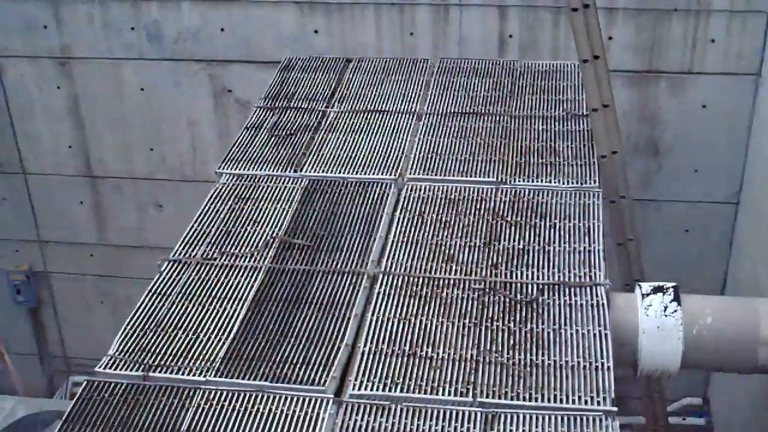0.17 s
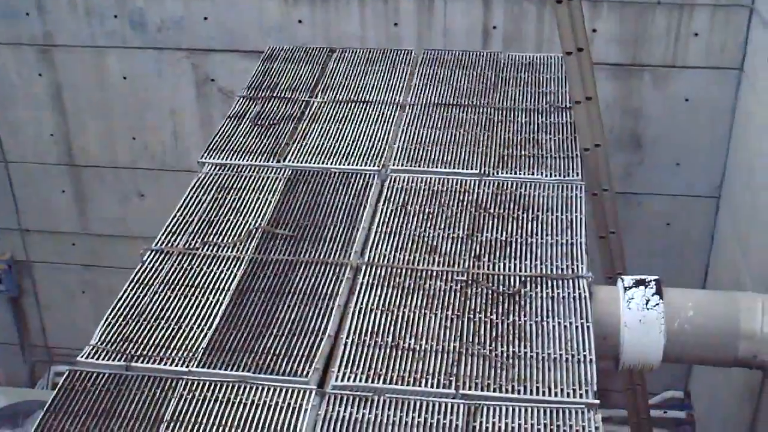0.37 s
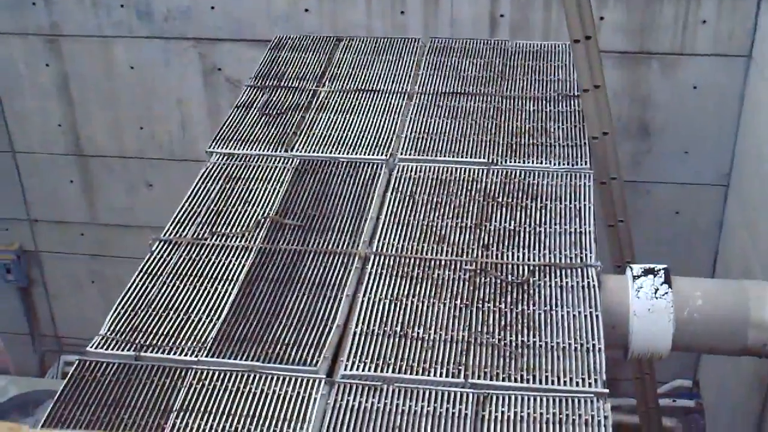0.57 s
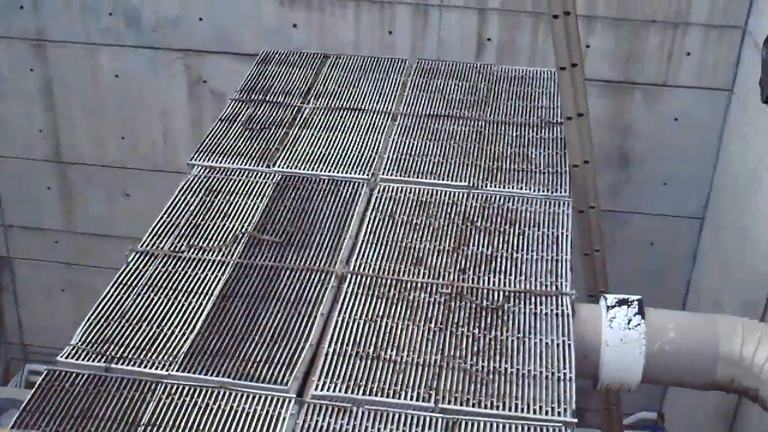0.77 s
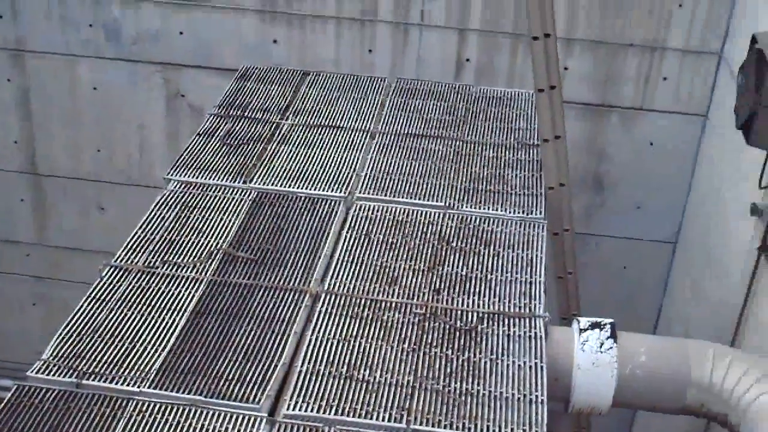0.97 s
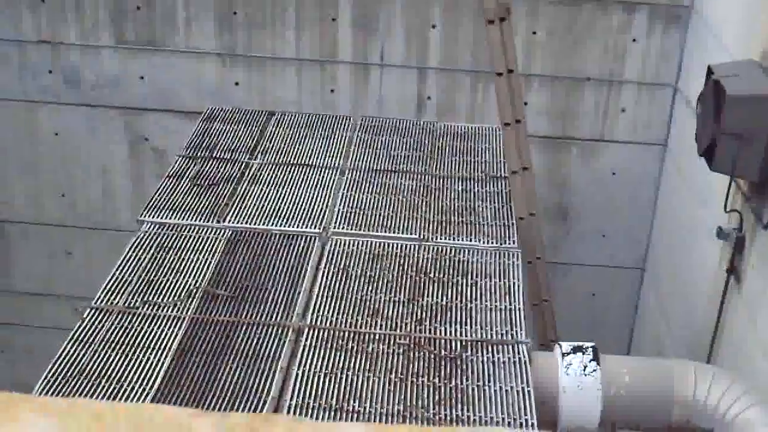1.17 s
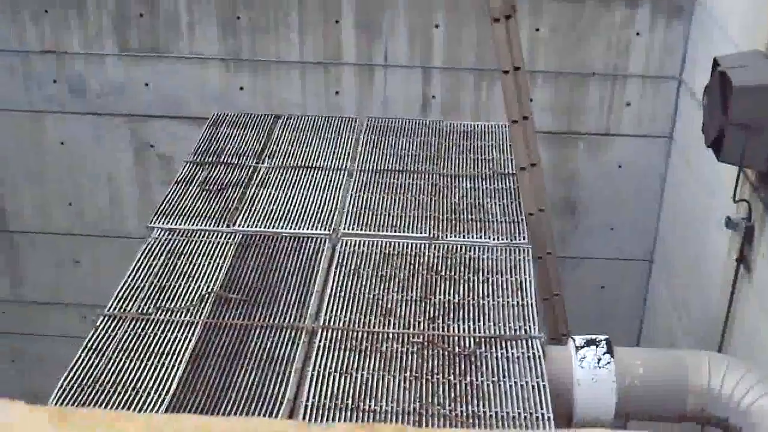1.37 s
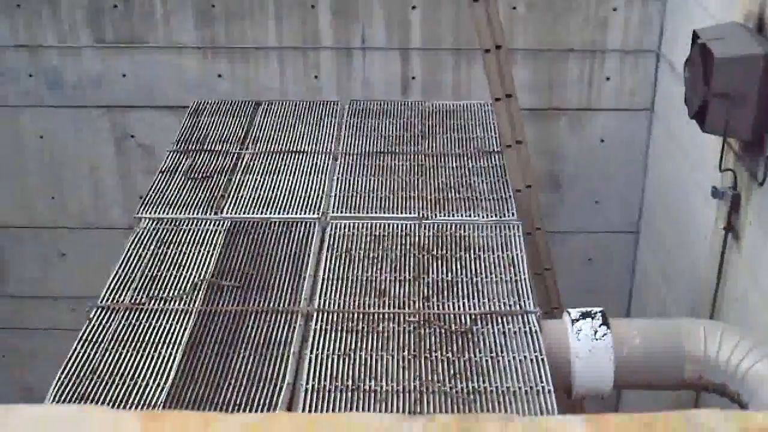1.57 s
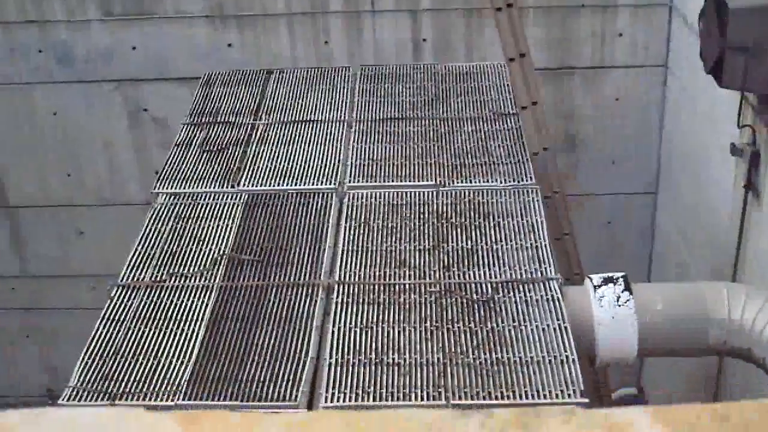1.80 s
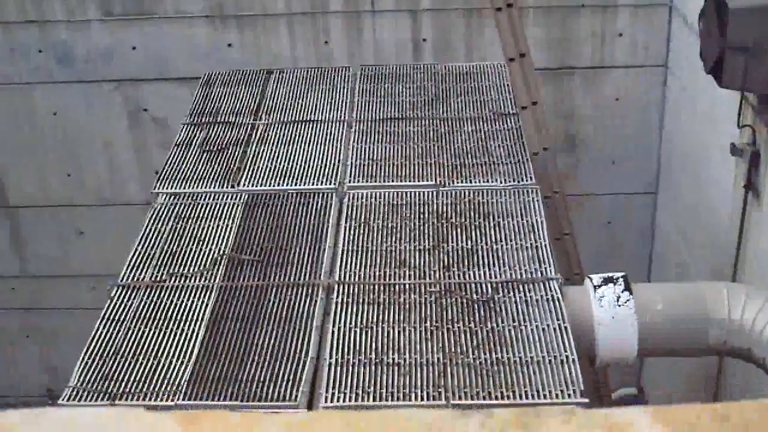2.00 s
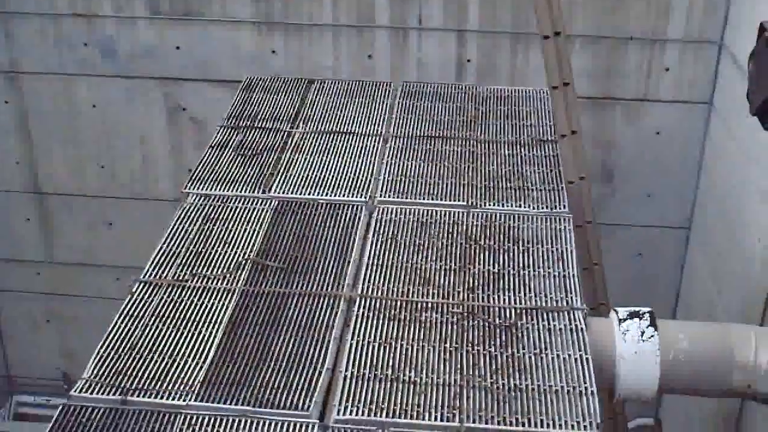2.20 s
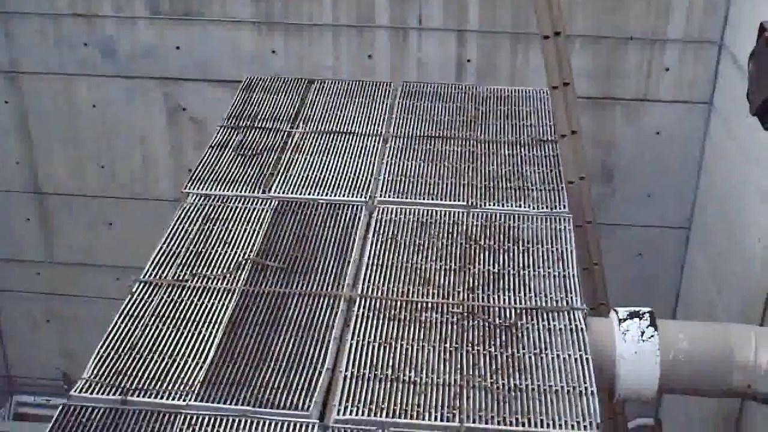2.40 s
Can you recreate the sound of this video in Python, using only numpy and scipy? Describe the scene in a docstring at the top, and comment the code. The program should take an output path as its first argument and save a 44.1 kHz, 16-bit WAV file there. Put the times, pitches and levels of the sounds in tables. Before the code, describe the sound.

Cooling tower fans whine steadily over rushing air, after a brief microphone pop.

```python
"""A microphone pops on and opens onto cooling tower fans in a concrete yard. Over a bed of rushing air
sits the whine of the drives, close tones that beat into a rough warble, with a thin whistle on top.
The tones swell and fade as the hand-held microphone moves. Close to it come a soft scuff and a few
sharp ticks of something small and hard."""
import sys
import numpy as np
from scipy import signal
from scipy.fft import rfft, irfft
from scipy.io import wavfile
from scipy.ndimage import uniform_filter1d

SR = 44100
rng = np.random.default_rng(int(sys.argv[2]) if len(sys.argv) > 2 else 0)


def transcribe(signal):
    """Save signal, clipped to [-1, 1], as a 16-bit WAV file at the path in sys.argv[1]."""
    frames = np.atleast_2d(signal).T
    limited = np.clip(frames, -1, 1)
    pcm = np.round(limited * 32767).astype(np.int16)
    wavfile.write(sys.argv[1], SR, pcm)


N = 108045
TIME = np.arange(N) / SR


def undb(db):
    """Decibels to gain."""
    return 10 ** (np.asarray(db) / 20)


def walk(per_s):
    """Random modulator: steps held 1 / per_s seconds and smoothed twice; mean 0, spread 1."""
    hold = int(SR / per_s)
    steps = np.repeat(rng.standard_normal(size=1024)[:N // hold + 1], hold)[:N]
    smooth = uniform_filter1d(uniform_filter1d(steps, hold), hold)
    return (smooth - smooth.mean()) / smooth.std()


def noise(colour):
    """Noise of rms 1, shaped by an EQ curve of (frequency [Hz], level [dB]) points."""
    hz, db = np.array(colour).T
    bin_hz = np.maximum(np.fft.rfftfreq(N, 1 / SR), 1)
    eq_db = np.interp(np.log(bin_hz), np.log(hz), db, left=-np.inf, right=-np.inf)
    shaped = irfft(rfft(rng.standard_normal(N)) * undb(eq_db), N)
    return shaped / shaped.std()


def running_phase(hz):
    """Phase of a tone that follows a pitch curve from a random start."""
    return 2 * np.pi * (np.cumsum(hz) / SR + rng.random())


# colour of the air bed (frequency [Hz], relative level [dB])
AIR_COLOUR = [(20, 0), (50, -6.5), (90, -4.5), (130, -2), (180, 1.5), (260, -1.5), (340, 0.5), (520, -6.5),
              (700, -4.5), (880, -2.5), (1050, -8), (1330, -8.5), (1950, -5.5), (2150, -2.5), (2330, -4),
              (2480, -10), (2750, -8), (3300, -11.5), (3800, -16.5), (4400, -18), (5000, -17),
              (5500, -24.5), (6600, -20), (7700, -28.5), (8700, -24), (10300, -20), (11500, -23.5),
              (13000, -31.5), (16000, -37.5)]

def air(level_db=-34, flicker_db=0.25):
    """Air rushes through the tower; every octave flickers a little on its own."""
    spectrum = rfft(noise(AIR_COLOUR))
    octave = np.log2(np.maximum(np.fft.rfftfreq(N, 1 / SR), 32) / 32)  # counted up from 32 Hz
    bands = (irfft(spectrum * np.maximum(1 - abs(octave - k), 0), N) for k in range(10))
    return undb(level_db) * sum(band * undb(flicker_db * walk(per_s=11.88)) for band in bands)


# colour of the scuff (frequency [Hz], relative level [dB])
SCUFF_COLOUR = [(2500, -10), (5500, 2), (8000, -8), (12000, -9), (16000, -20)]

def scuff(peak_s=0.28, width_s=0.03, level_db=-45):
    """A brief soft hiss, like a finger sliding on the casing."""
    swell = np.exp(-((TIME - peak_s) / width_s) ** 2)
    return undb(level_db) * noise(SCUFF_COLOUR) * swell


# tick cues (time [s], gain [dB])
TICK_CUES = [(0.147, -33), (1.5134, -7.5), (1.8680, -24), (1.8707, -31), (1.9646, -9)]
# modes that ring in a tick (frequency [Hz], relative level [dB], time to fall 60 dB [s])
TICK_RING = [(2480, -8, 0.012), (3820, 1, 0.0058), (5660, -6.5, 0.0099), (7200, -11, 0.0068),
             (7900, -17, 0.0068), (8630, -16, 0.0054), (11070, -12, 0.0055)]
# colour of a tick's crack (frequency [Hz], relative level [dB])
CRACK_COLOUR = [(1200, -20), (2400, -5), (6000, -2), (11500, -7), (13000, -19), (16000, -24)]

def ticks(crack_db=-6, crack_decay_s=0.0009, attack_s=0.00008):
    """Something small and hard clicks near the microphone: a crack and a few very short modes."""
    out, t = np.zeros(N), TIME[:SR // 20]
    ring = sum((-1) ** k * undb(db) * np.sin(2 * np.pi * hz * t) * np.exp(-np.log(1000) * t / t60)
               for k, (hz, db, t60) in enumerate(TICK_RING))
    attack = 1 - np.exp(-t / attack_s)
    for start_s, db in TICK_CUES:
        crack = undb(crack_db) * noise(CRACK_COLOUR)[:len(t)] * np.exp(-t / crack_decay_s)
        i = int(start_s * SR)
        out[i:i + len(t)] += undb(db) * (ring + crack) * attack
    return out


# surges at switch-on (time [s], rise [s], hold [s], decay [s])
POP_SURGES = [(0.0616, 0.000047, 0.0015, 0.007), (0.0658, 0.00063, 0.00042, 0.004),
              (0.0691, 0.0012, 0.00048, 0.0014)]

def switch_on_pop(drive_db=0.8, settle_s=0.078, input_limit=0.87):
    """The microphone input jumps to its limit three times, then swings under zero and settles."""
    pop = 0
    for start, rise, hold, decay in POP_SURGES:
        attack = np.clip((TIME - start) / rise, 0, 1)
        release = np.exp(-np.maximum(TIME - start - rise - hold, 0) / decay)
        pop = np.maximum(pop, attack * release)
    high_passed = signal.lfilter([1, -1], [1, -np.exp(-1 / (settle_s * SR))], pop)
    return np.minimum(undb(drive_db) * high_passed, input_limit)


# the two whistle tones (frequency [Hz])
WHISTLE_PITCHES = [5950, 6765]
# their fader moves (time [s], lower tone's level [dB], upper tone's level [dB])
WHISTLE_FADERS = [(.08, -47, -65), (.12, -48, -65), (.17, -52, -63), (.25, -54, -65), (.31, -44, -65),
                  (.44, -46.5, -65), (.5, -63, -65), (.53, -48, -65), (.575, -47, -65), (.6, -62, -65),
                  (.63, -47, -65), (.79, -48, -62), (.86, -56, -63), (.95, -56, -65), (1.02, -51.5, -65),
                  (1.14, -46, -68), (1.27, -50.5, -68), (1.33, -56, -67), (1.41, -48, -71),
                  (1.5, -48.5, -69), (1.62, -59, -68), (1.69, -47.5, -65), (1.78, -58, -68),
                  (1.94, -56, -59), (2.01, -48, -59), (2.07, -49.5, -61), (2.12, -57, -60),
                  (2.44, -55, -61)]

def whistle(flutter_hz=75, upper_db=-8, lower_db=-15, wander_hz=4.45, flicker_db=2):
    """Two thin, unsteady tones come and go; a sideband above and below gives each a fast flutter."""
    times, *faders = np.array(WHISTLE_FADERS).T
    flutter = running_phase(np.full(N, flutter_hz))
    out = 0
    for hz, fader in zip(WHISTLE_PITCHES, faders):
        phase = running_phase(hz + wander_hz * walk(per_s=20))
        sidebands = undb(upper_db) * np.sin(phase + flutter) - undb(lower_db) * np.sin(phase - flutter)
        level_db = np.interp(TIME, times, fader) + flicker_db * walk(per_s=35)
        out += np.sqrt(2) * (np.sin(phase) + sidebands) * undb(level_db)
    return out


# strong drive tones (frequency [Hz])
DRIVE_PITCHES = [1690.3, 1726.8, 1757.7, 1623.0, 811.3, 2115.8]
# their swells as the microphone moves (time [s], then for each tone: level before trim [dB])
DRIVE_FADERS = [(0.08, -32, -37, -40, -43, -43, -53), (0.22, -29, -36, -41, -44, -45, -55),
                (0.45, -30, -35, -43, -42, -43, -61), (0.52, -32, -39, -44, -42, -46, -64),
                (0.62, -28, -38, -42, -39, -47, -55), (0.88, -30, -38, -40, -41, -49, -64),
                (1.02, -29, -44, -35, -43, -44, -57), (1.2, -30, -53, -35, -59, -43, -58),
                (1.35, -39, -46, -36, -45, -44, -55), (1.45, -34, -42, -32, -45, -46, -50),
                (1.56, -37, -41, -31, -43, -52, -54), (1.7, -33, -43, -32, -40, -55, -44),
                (1.95, -29, -41, -33, -40, -56, -46), (2.2, -30, -41, -34, -41, -51, -59),
                (2.44, -33, -36, -37, -41, -54, -54)]
# weaker tones around the whine (frequency [Hz], level [dB], pitch wander [Hz])
WEAK_TONES = [(1187.2, -52.5, 1.5), (1432, -54, 3), (1469.5, -50, 1), (1504, -47, 5), (1566, -49, 5),
              (1586.7, -47, 2), (1654, -48, 3), (1671.5, -43, 2), (1794.2, -46, 2), (1855.8, -46, 1),
              (1892.9, -48, 1), (2178, -50, 6), (2261, -55, 3), (2312, -52, 10), (3176, -58, 3)]
# colour of the whine scattered by turbulent air (frequency [Hz], relative level [dB])
SCATTER_COLOUR = [(1400, -17), (1480, -18), (1540, -7), (1590, 0.5), (1650, -1), (1700, 10), (1760, -6),
                  (1830, 2.5), (1910, -23), (2000, -42)]

def whine(trim_db=0.8, weak_fade_db=4, scatter_db=-36.5):
    """Close drive tones share one nearly steady speed and beat over a narrow band of scatter."""
    speed = 1 + 0.00044 * walk(per_s=2.952)

    def tone(hz, wander_hz):
        return np.sqrt(2) * np.sin(running_phase(hz * speed + wander_hz * walk(per_s=20)))

    times, *faders = np.array(DRIVE_FADERS).T
    out = 0
    for hz, fader in zip(DRIVE_PITCHES, faders):
        out += tone(hz, wander_hz=0.74) * undb(trim_db + np.interp(TIME, times, fader))
    for hz, db, wander_hz in WEAK_TONES:
        out += tone(hz, wander_hz) * undb(db + weak_fade_db * walk(per_s=3.9))
    return out + undb(scatter_db) * noise(SCATTER_COLOUR)


def scene():
    """Mono mix of the fans and the small handling sounds."""
    return (whine() + whistle() + air() + ticks() + scuff())[None]


def record(dry):
    """The microphone opens with a pop; a steep low-pass cuts the very top."""
    open_s, fade_s, top_hz = 0.0704, 0.0081, 15800
    fade_in = np.clip((TIME - open_s) / fade_s, 0, 1)
    low_pass = signal.ellip(8, 0.2, 70, top_hz, fs=SR, output="sos")
    return signal.sosfilt(low_pass, dry * fade_in + switch_on_pop())


dry = scene()
out = record(dry)
transcribe(out)
```